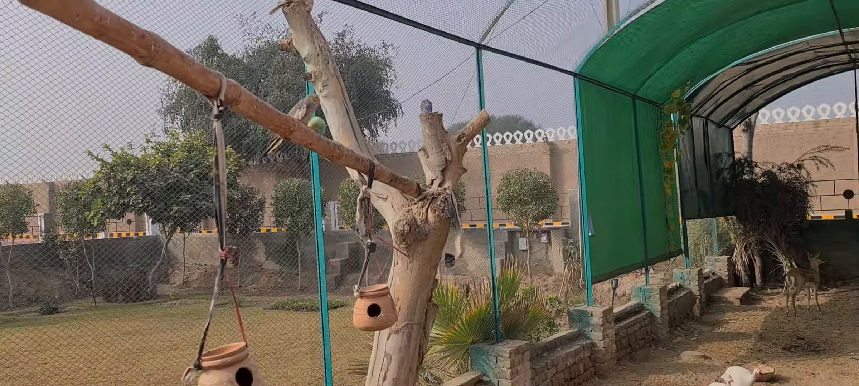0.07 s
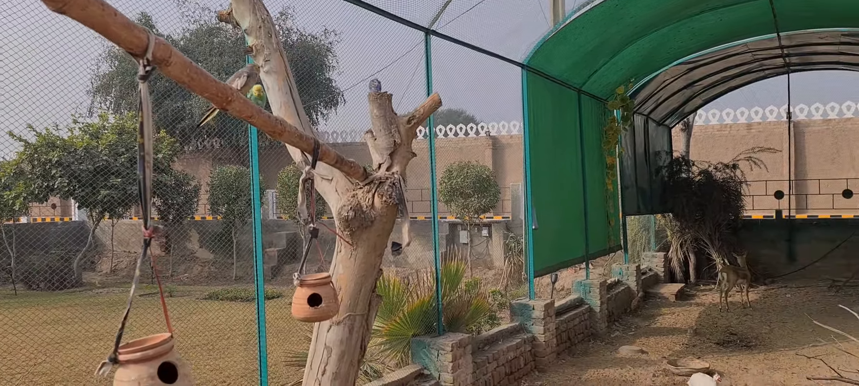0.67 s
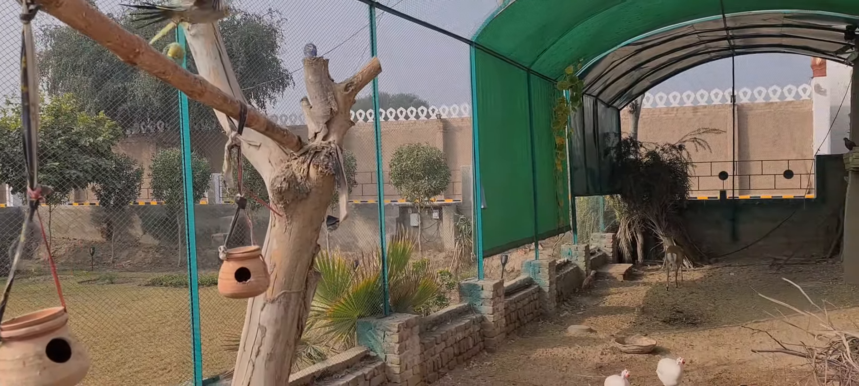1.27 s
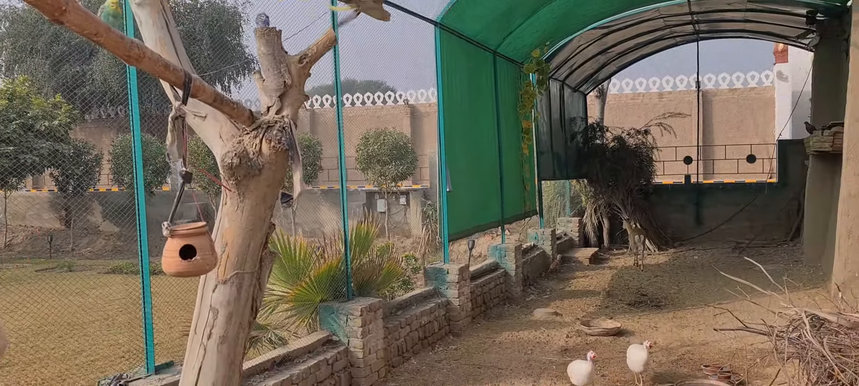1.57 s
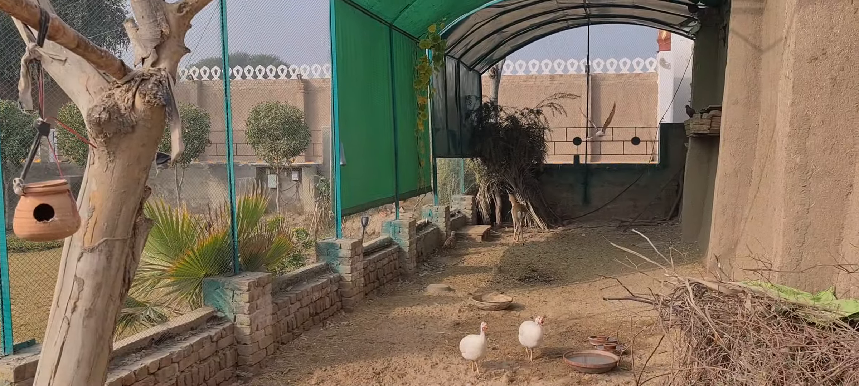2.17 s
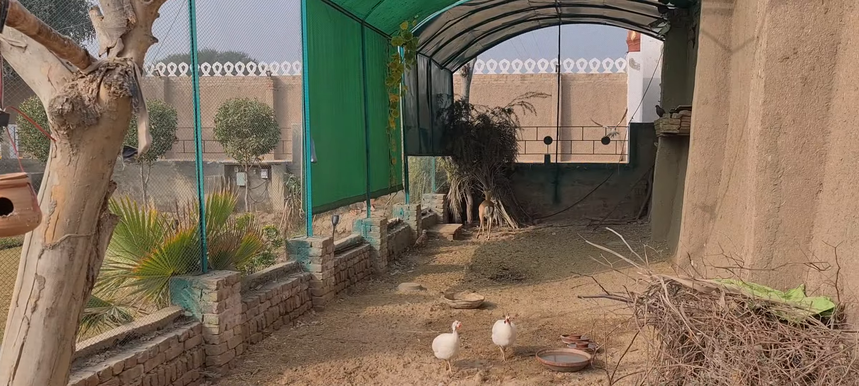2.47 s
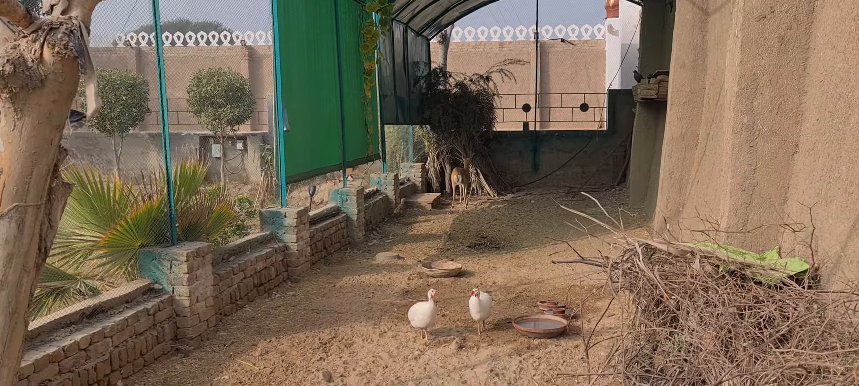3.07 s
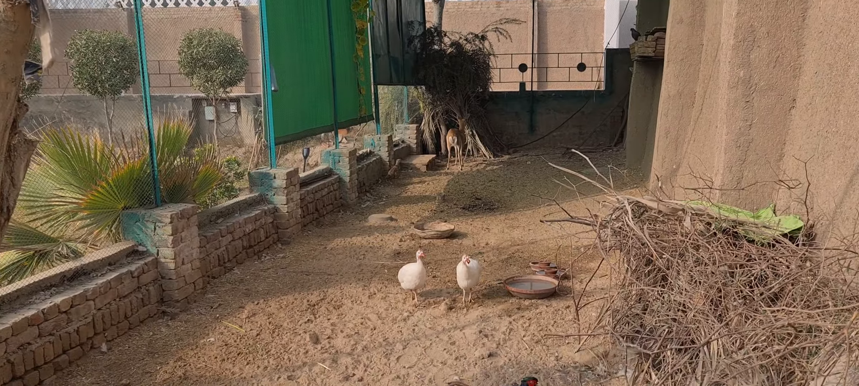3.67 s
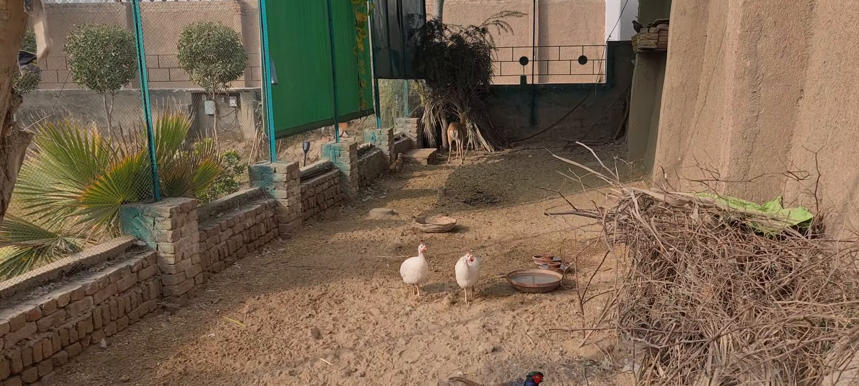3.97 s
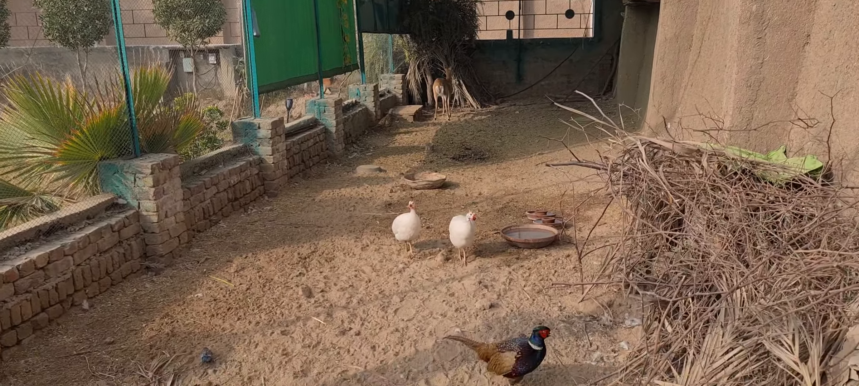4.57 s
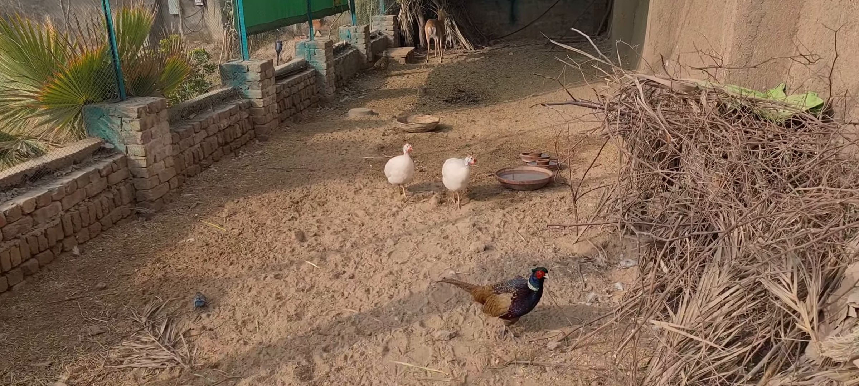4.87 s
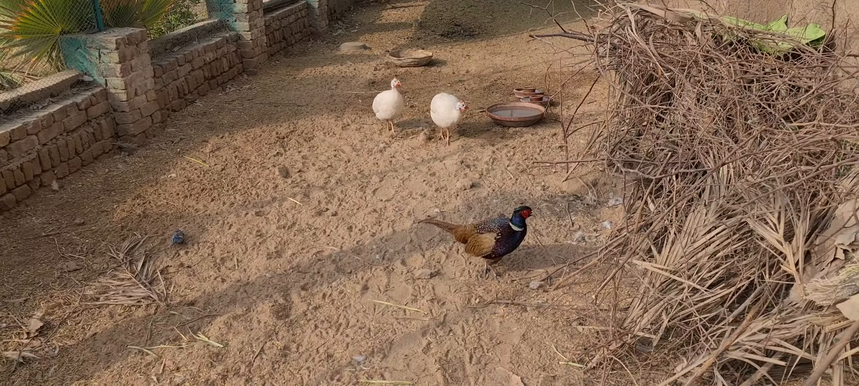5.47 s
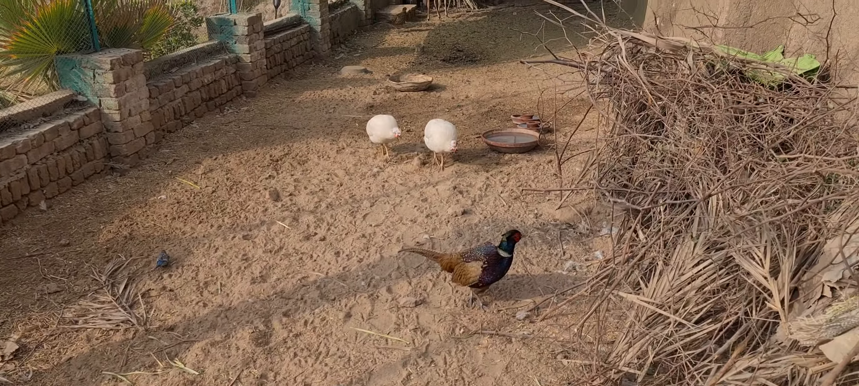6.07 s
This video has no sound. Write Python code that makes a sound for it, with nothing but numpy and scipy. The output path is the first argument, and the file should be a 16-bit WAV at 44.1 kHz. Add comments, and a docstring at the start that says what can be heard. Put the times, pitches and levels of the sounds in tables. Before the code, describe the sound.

In a quiet outdoor aviary, a distant bird rasps twice while small birds chirp faintly. A nearby parakeet then gives three harsh, rising squawks mixed with sharp little yelps, echoing lightly off the walls. Afterwards there are only a few chirps, one more yelp and light scuffs. Soft, low handling bumps on the moving microphone gather near the end, over a faint rumble and hush.

```python
"""A netted outdoor aviary with a mud wall and an arched shelter, over faint rumble and hush.
0-1.1 s: a far bird rasps twice; small birds chirp. 1.2-2.5 s: a near parakeet gives three harsh rising
squawks, its voice shaken by a second oscillation, and sharp yelps that break an octave down. The walls
answer each call. Soft handling bumps on the walking camera start under the squawks and crowd together
after 5 s, among light scuffs, two more chirps and a last yelp with a short falling echo off the wall."""
import sys
import numpy as np
from scipy import signal
from scipy.fft import rfft, irfft, next_fast_len
from scipy.io import wavfile
from scipy.ndimage import uniform_filter1d, map_coordinates

SR = 44100
rng = np.random.default_rng(int(sys.argv[2]) if len(sys.argv) > 2 else 0)


def int16_out(signal):
    """Quantize to a 16-bit WAV file."""
    q = np.round(np.clip(np.atleast_2d(signal).T, -1, 1) * 32767)
    wavfile.write(sys.argv[1], SR, q.astype(np.int16))


N = 278712

# Parakeet throat and beak: f/Hz, gain/dB
THROAT = [(700, -29), (1100, -5), (1400, -4.5), (2100, -2.5), (2600, -4), (3200, -4.5), (3700, -4.5),
          (4200, -11.5), (4700, -18), (6200, -38.5), (8000, -38), (15500, -71)]
# Colour of the top harmonics: f/Hz, gain/dB
SIZZLE = [(4200, -53.5), (5200, 9), (7000, -0.5), (9500, -34.5), (11500, -3.5), (15500, -12.5)]
# t/s, lead-in/s, length/s, time to top/s, climb width/s, low f/Hz, top f/Hz, level/dB, lead-in/dB,
# lead-in roughness, open roughness, L-R/dB, extra echo/dB
SQUAWKS = [(1.165, 0.0566, 0.2129, .144, 0.02682, 1530, 2152, -31, -6.5, 1.1, 0.46, -1.5, -2),
           (1.568, 0.0266, 0.1431, .135, .08, 1102, 2035, -31, -5, .25, .44, 2.5, -2),
           (2.132, 0.0424, 0.145, 0.14216, .057, 1199, 2070, -40.5, -3.5, 0.16, .55, 3, 4.5)]
def squawk(start_s, lead_s, length_s, top_s, climb_s, low_hz, top_hz, db, lead_db, lead_rough,
           open_rough, side_db, sag_hz=330.4, sag_s=.026, open_s=.00636):
    """A soft lead-in opens into a harsh call that climbs and sags; harder calls sizzle more."""
    voices, sizzle = np.zeros((2, 2, N))
    t = np.arange(int((length_s + .06) * SR)) / SR
    climb = low_hz + (top_hz - low_hz) * bell(t - top_s, climb_s)
    sag = top_hz - sag_hz * (1 - bell(t - top_s, sag_s))
    pitch = np.where(t < top_s, climb, sag)
    low = np.clip((top_hz - pitch) / 600, 0, 1)  # under its top the voice is brighter but softer
    closed = .5 - .5 * np.tanh((t - lead_s) / open_s)
    gain = amp(db + lead_db * closed - 4 * low)
    gain *= envelope(t, length_s, attack_s=.0168, release_db_per_s=791.5)
    rough = np.clip(lead_rough * closed + open_rough * (1 - closed), 0, 1)
    overtone_db = -8 * closed + (-3.5 + 6 * low) * (1 - closed)
    pitch = pitch * (1 + .016 * wobble(130, len(t)))
    voice = harsh(pitch, rough, overtone_db, rattle_hz=210, swing=.088, jitter=.066, flutter_db=8.5)
    # turbulence roughens the overtones, leaves the fundamental clear
    turbulence = unit(rng.standard_normal(len(t)) * amp(5 * wobble(300, len(t))))
    hiss = amp(overtone_db - 2) * rough * fade(filtered(turbulence, lambda hz: hz > 2700))
    add(voices, start_s, panned(side_db) * scattered(gain * (voice + hiss)))
    buzz = harsh(pitch, rough, 0, rattle_hz=210, swing=.09, jitter=.12, flutter_db=8)
    sizzle_gain = amp(-8.5 - .5 * low) * gain ** 1.686
    add(sizzle, start_s, panned(side_db) * scattered(sizzle_gain * buzz))
    return coloured(voices, THROAT) + coloured(sizzle, SIZZLE)


def syrinx(pitch, overtone_db, count=12):
    """A fundamental and equal overtones on a moving pitch."""
    phase = 2 * np.pi * np.cumsum(pitch) / SR
    overtones = sum(np.sin(k * phase) * (k * pitch < SR / 2) for k in range(2, count + 1))
    return np.sqrt(2) * (np.sin(phase) + amp(overtone_db) * overtones)


def harsh(pitch, rough, overtone_db, rattle_hz, swing, jitter, flutter_db):
    """A second, uneven oscillation shakes the voice in pitch and strength."""
    size = len(pitch)
    uneven_hz = rattle_hz * (1 + .2612 * wobble(120, size))
    rattle = np.sin(2 * np.pi * np.cumsum(uneven_hz) / SR)
    shaken = pitch * (1 + rough * (swing * rattle + jitter * wobble(900, size)))
    flutter = amp(flutter_db * rough * np.tanh(rattle + wobble(407.5, size)))
    return fade(syrinx(shaken, overtone_db) * unit(flutter))


# Colour of the voice crack: f/Hz, gain/dB
CRACK = [(900, -8), (1500, -7.5), (3200, 26), (4500, 11), (7000, -9.5), (15500, -10.5)]
# break t/s, lead-in/s, f/Hz, lead-in lift/Hz, level/dB, undertone/dB, crack/dB, L-R/dB
YELPS = [(1.513, 0.0131, 3084, -450, -40.5, 2, -16.5, 8.5), (1.571, 0.0125, 2378, 3, -38, -12.5, -21.5, 10),
         (2.461, .022, 2800, 748.5, -39.5, 5, -11, 3), (5.054, 0.0271, 2864, 880, -39.5, -1.5, -26, -1.5)]
def yelps(rise_db_per_s=382, fall_db_per_s=652.5, lift_ahead_s=.01553):
    """Short whistles slide into a break: the period doubles, the voice roughens and cracks."""
    voices, cracks = np.zeros((2, 2, N))
    for break_s, lead_s, hz, lift_hz, db, under_db, crack_db, side_db in YELPS:
        t = np.arange(-lead_s, .03, 1 / SR)
        broken = bell(t, width_s=.00392)
        gain = amp(db + np.minimum(rise_db_per_s * t, -fall_db_per_s * t))
        pitch = hz + lift_hz * bell(t + lift_ahead_s, width_s=.007)
        pitch *= 1 + (.015 + .045 * broken) * wobble(1200, len(t))
        undertone = amp(under_db) * broken * syrinx(pitch / 2, overtone_db=-4, count=7)
        voice = gain * fade(syrinx(pitch, overtone_db=4.5, count=3) + undertone)
        add(voices, break_s - lead_s, panned(side_db) * scattered(voice, spread_s=.00722))
        crack = amp(crack_db) * gain * broken * rng.standard_normal((2, len(t)))
        add(cracks, break_s - lead_s, panned(side_db) * crack)
    return coloured(voices, THROAT) + coloured(cracks, CRACK)


# mid t/s, length/s, f/Hz, glide/Hz, arch/Hz, level/dB, L-R/dB
WHISTLES = [(0.51, 0.068, 3400, -550, 597.5, -61, -9), (0.691, 0.126, 3574, -1300, 300.5, -74.5, -12),
            (0.966, 0.1, 3850, -1200, 399.5, -74, -24), (1.072, 0.12, 3950, -800, 298, -70, -11.5),
            (3.999, 0.0533, 5020, -450, -450, -65.5, -5.5), (5.104, 0.03034, 3200, -900, -10, -53.5, -7.5),
            (5.675, 0.04, 2991, 697, 201, -55, 3.5)]
def whistles(edge_db=-7.5):
    """Small birds' gliding whistles, and the last yelp's short falling echo off the wall (5.104 s)."""
    out = np.zeros((2, N))
    for mid_s, length_s, hz, glide_hz, arch_hz, db, side_db in WHISTLES:
        u = np.linspace(-1, 1, int(length_s * SR))
        pitch = hz + glide_hz * u / 2 - arch_hz * u ** 2
        pitch *= 1 + .024 * wobble(600, len(u))
        voice = amp(db + edge_db * u ** 2) * fade(syrinx(pitch, overtone_db=-22, count=2))
        pair = scattered(voice, spread_s=.00566, direct_db=-.5)
        add(out, mid_s - length_s / 2, panned(side_db) * pair)
    return out


# Far bird's throat: f/Hz, gain/dB
FAR_THROAT = [(900, 9), (1700, -5.5), (2000, -9), (2600, -2), (3600, -22), (5500, -33), (9000, -45.5)]
# t/s, length/s, f/Hz, level/dB
RASPS = [(0.111, .23, 1786, -56), (0.667, .24, 1721, -58.5)]
def rasps(rise_hz_per_s=450, swell_db_per_s=17.5):
    """A far bird's long, very hoarse calls creep up in pitch and level."""
    out, t = np.zeros((2, N)), np.arange(SR // 2) / SR
    for start_s, length_s, hz, db in RASPS:
        held_s = np.minimum(t, length_s)
        gain = amp(db + swell_db_per_s * (held_s - length_s))
        gain *= envelope(t, length_s, attack_s=.0226, release_db_per_s=198)
        pitch = hz + rise_hz_per_s * held_s
        voice = harsh(pitch, rough=1, overtone_db=0, rattle_hz=130, swing=.065, jitter=.055, flutter_db=5)
        add(out, start_s, scattered(gain * voice, spread_s=.0107))
    return panned(side_db=-6) * coloured(out, FAR_THROAT)


def scattered(x, spread_s=.00494, direct_db=-6):
    """Ground, posts and netting send a call to each microphone port by many short paths."""
    t = np.arange(SR // 40) / SR
    paths = rng.standard_normal((2, len(t))) * np.exp(-t / spread_s)
    paths /= np.linalg.norm(paths[0])
    paths[:, 0] += amp(direct_db)
    pair = signal.fftconvolve(x[None], paths, axes=1)
    return pair * np.linalg.norm(x) / np.linalg.norm(pair, axis=1, keepdims=True)


# Diffuse decay: f/Hz, T60/s
YARD_T60 = [(300, 0.97), (2000, 0.637), (3800, 0.803), (5500, 0.065), (12000, 0.137)]
# delay/s, level/dB
WALL_ECHOES = [(0.054, -25), (0.101, -25), (.14, -25)]
def yard(x, tail_db, echo_db, build_s=.00757, smear_s=.0099):
    """Calls plus their smeared wall echoes and a diffuse tail that dies fastest around 5.5 kHz."""
    hz, t, noise = signal.stft(rng.standard_normal((2, SR)), SR, nperseg=256)
    decay = amp(-60 * t / along(YARD_T60, hz)[:, None]) * (1 - np.exp(-t / build_s))
    tail = signal.istft(noise * decay, SR, nperseg=256)[1]
    answer = amp(tail_db) * tail / np.linalg.norm(tail[0])
    for delay_s, db in WALL_ECHOES:
        smear = rng.standard_normal((2, SR // 30)) * np.exp(-np.arange(SR // 30) / SR / smear_s)
        add(answer, delay_s, amp(db + echo_db) * smear / np.linalg.norm(smear[0]))
    answer = coloured(answer, [(4000, 2), (5500, 10), (12000, 4.5)])
    return x + signal.fftconvolve(x, answer, axes=1)[:, :N]


# t/s, level/dB, click/dB, L-R/dB
BUMPS = [(1.275, -26, -9.5, -38), (1.42, -33.5, -19.5, -41), (3.306, -40.5, -8.5, -21),
         (4.174, -35.5, -17, -12.5), (5.193, -34.5, -14.5, -22), (5.269, -39, -7, -35.5),
         (5.296, -34, -15, -24), (5.301, -34, -33.5, -33), (5.339, -35, -18, -34.5),
         (5.509, -39, -13, -37.5), (5.664, -35, -13, -38.5), (5.755, -28, -11.5, -34),
         (6.135, -30, -21.5, -39), (6.184, -33.5, -19.5, -36.5), (6.295, -31.5, -15, -34.5)]
def bumps(body_hz=74, body_t60_s=.0668, knock_hz=150, knock_t60_s=.0243, click_hz=1300):
    """Handling: a dull click, a short knock and a low, quickly damped swing of the camera body."""
    out, t = np.zeros((2, N)), np.arange(SR // 6) / SR
    variations = rng.standard_normal((len(BUMPS), 2))
    for (start_s, db, click_db, side_db), (detune, hardness) in zip(BUMPS, variations):
        swing = np.sin(2 * np.pi * body_hz * np.exp(.1 * detune) * t - .6)
        swing *= amp(-1.5 - 60 * t / body_t60_s) * (1 - np.exp(-t / .00131))
        knock = np.sin(2 * np.pi * knock_hz * t - 1)
        knock *= amp(-6 - 60 * t / knock_t60_s) * (1 - np.exp(-t / .001084))
        contact = amp(-60 * t / .002) * (.4 * rng.standard_normal(len(t)) - 1)
        band_hz = [180, click_hz * np.exp(.15 * hardness)]
        click = signal.lfilter(*signal.butter(2, band_hz, "bandpass", fs=SR), contact)
        click *= amp(click_db + 2.5) / np.abs(click).max()
        add(out, start_s, panned(side_db) * amp(db) * (swing + knock + click))
    return out


# mid t/s, width/s, f/Hz, bandwidth/oct, level/dB
NOISE_SWELLS = [(0.88, 0.0143, 3210, 1.06, -67), (1.32, 0.0393, 36, 0.32, -45.5),
                (1.5, 0.228, 677, 0.326, -67), (1.745, .02, 652, 0.186, -59.5),
                (1.854, 0.0194, 602, 0.292, -59.5), (1.889, 0.00926, 852, 0.64, -54),
                (3.557, 0.043, 800, 1.06, -75.5), (4.204, 0.1, 1400, 0.705, -73.5),
                (4.952, 0.00073, 1454, 0.72, -49.5), (5.984, 0.048, 1780, 1.23, -79.5)]
def noise_swells():
    """Scuffs, low hoots, a dull thud, and a faint, broad swell of low-mid noise under the squawks."""
    out, t = np.zeros((2, N)), np.arange(SR) / SR
    for mid_s, width_s, centre_hz, octaves, db in NOISE_SWELLS:
        grit = rng.standard_normal((2, SR)) * amp(4.63 * wobble(149.3, SR))
        band = filtered(grit, lambda hz: np.exp(-.5 * (np.log2((hz + 1) / centre_hz) / octaves) ** 2))
        add(out, mid_s - .5, amp(db) * unit(band) * bell(t - .5, width_s))
    return out


# Rumble spectrum: f/Hz, density/dB
RUMBLE = [(15, -32.5), (25, -3.5), (59, 0.5), (113, -8), (161, -14), (193, -7), (215, -13), (450, -17),
          (580, -63.5), (990, -120)]
# t/s, level/dB
RUMBLE_LEVEL = [(0, -59.5), (1.1, -59), (1.5, -56), (2.7, -61.5), (4.8, -60), (6.32, -59.5)]
# Hush spectrum: f/Hz, density/dB
HUSH = [(300, -35), (470, -0.5), (800, -1.5), (1050, -6), (1400, -3), (2000, -8), (3000, -9), (4300, -18),
        (7300, -24), (11000, -29.5), (15500, -26.5)]
def air(hush_db=-70):
    """Far rumble swells and sinks beside a steady outdoor hush."""
    rumble_db = np.interp(np.arange(N) / SR, *np.transpose(RUMBLE_LEVEL)) + 1.655 * wobble(12, N)
    return amp(rumble_db) * rush(RUMBLE, patchy_db=1.5) + amp(hush_db) * rush(HUSH, patchy_db=1.1655)


# f/Hz, left-right correlation
AIR_COHERENCE = [(60, 0.867), (380, 0.686), (2380, 0.036), (15000, 0.07)]
# f/Hz, L-R/dB
AIR_BALANCE = [(60, -4.5), (240, -1.5), (950, -4), (3770, -2.5), (15000, -1.5)]
def rush(spectrum, patchy_db):
    """Stereo noise of rms 1 with patches of random gain, wider in the treble."""
    noise = signal.stft(rng.standard_normal((2, N)), nperseg=512)[2]
    patches = uniform_filter1d(uniform_filter1d(rng.standard_normal(noise.shape[1:]), 6, 0), 14, 1)
    pair = signal.istft(noise * amp(patchy_db * unit(patches)), nperseg=512)[1][:, :N]
    angle = lambda hz: np.arccos(along(AIR_COHERENCE, hz)) / 2
    mid_side = lambda hz: amp(along(spectrum, hz)) * [np.cos(angle(hz)), np.sin(angle(hz))]
    mid, side = filtered(pair, mid_side)
    balance = lambda hz: amp(np.outer([.5, -.5], along(AIR_BALANCE, hz)))
    return unit(filtered(np.array([mid + side, mid - side]), balance))


def amp(db):
    """Decibels to gain."""
    return 10 ** (np.asarray(db) / 20)


def unit(x):
    """Scale to rms 1."""
    return x / np.sqrt(np.mean(x ** 2) + 1e-20)


def along(points, hz):
    """Interpolate (f/Hz, value) points on a log axis."""
    f, value = np.transpose(points)
    return np.interp(np.log(hz + 1), np.log(f + 1), value)


def wobble(rate_hz, size):
    """Smooth random curve, rate_hz knots a second."""
    knots = rng.standard_normal(int(size * rate_hz / SR) + 4)
    return map_coordinates(knots, [np.arange(size) * rate_hz / SR])


def filtered(x, response):
    """Apply a gain given as a function of frequency."""
    size = x.shape[-1]
    padded = next_fast_len(size + SR // 4)
    return irfft(rfft(x, padded) * response(np.fft.rfftfreq(padded, 1 / SR)), padded)[..., :size]


def coloured(x, points):
    """Filter by (f/Hz, gain/dB) points."""
    return filtered(x, lambda hz: amp(along(points, hz)))


def add(track, start_s, x):
    """Mix x into the track."""
    part = track[..., max(round(start_s * SR), 0):][..., :x.shape[-1]]
    part += x[..., :part.shape[-1]]


def panned(side_db):
    """Left and right gains of constant total power."""
    return unit(amp([[side_db / 2], [-side_db / 2]]))


def fade(x):
    """Taper 2.5 ms at each end."""
    return x * signal.windows.tukey(len(x), min(1, SR / 200 / len(x)))


def bell(t, width_s):
    """Gaussian of height 1 at t = 0."""
    return np.exp(-.5 * (t / width_s) ** 2)


def envelope(t, length_s, attack_s, release_db_per_s):
    """Attack, hold until length_s, decay."""
    return np.clip(t / attack_s, 0, 1) * amp(-release_db_per_s * np.maximum(t - length_s, 0))


# Camera body shading the right port: f/Hz, gain/dB
BODY_SHADE = [(1000, 1.5), (3300, 1.5), (4300, -6), (5500, -42.5), (8000, -40), (12000, 0.5)]
def scene(near_db=-1.2444, far_db=4):
    """Near and far birds in the yard, then bumps, noise swells and air."""
    near = sum(yard(squawk(*call), tail_db=wet_db - 17.5, echo_db=wet_db - 1)
               for *call, wet_db in SQUAWKS)
    near += yard(yelps() + whistles(), tail_db=-22, echo_db=-4)
    near = filtered(near, lambda hz: amp(np.outer([0, 1], along(BODY_SHADE, hz))))
    far = yard(rasps(), tail_db=-2.5, echo_db=3.5)
    return amp(near_db) * near + amp(far_db) * far + bumps() + noise_swells() + air()


# Microphone port resonance: f/Hz, gain/dB
PORTS = [(7000, 1), (9000, -1), (10300, 3.5), (11700, 7.5), (13000, 0.5), (15500, 0)]
BAND_LIMIT_HZ = 15730
def record(dry):
    """The ports ring in the high treble; the camera keeps nothing above its band limit."""
    return filtered(dry, lambda hz: amp(along(PORTS, hz)) * (hz < BAND_LIMIT_HZ))


dry = scene()
out = record(dry)
int16_out(out)
```